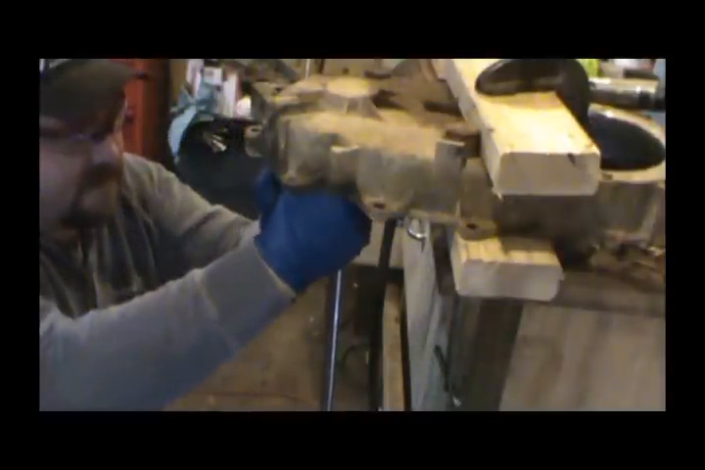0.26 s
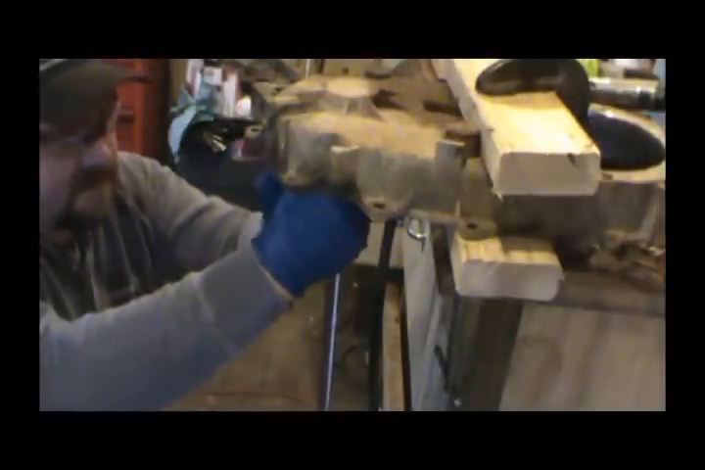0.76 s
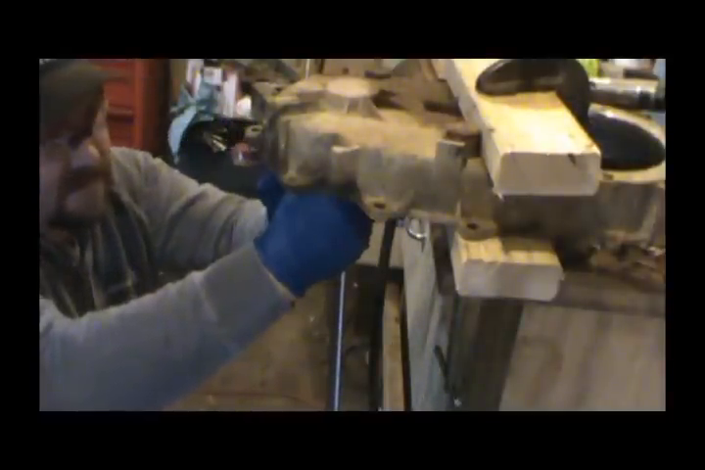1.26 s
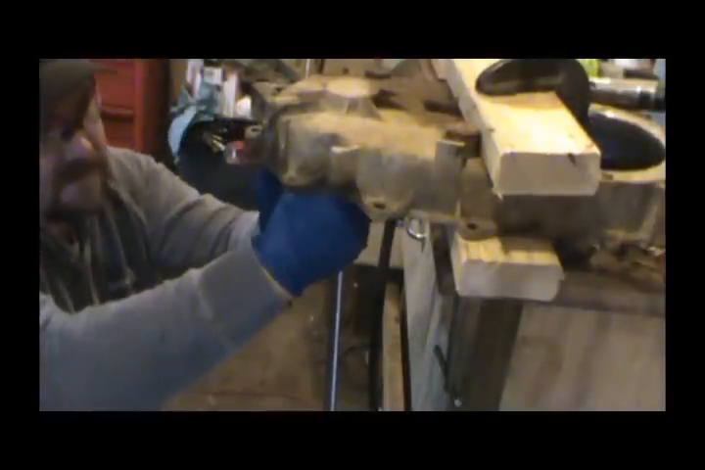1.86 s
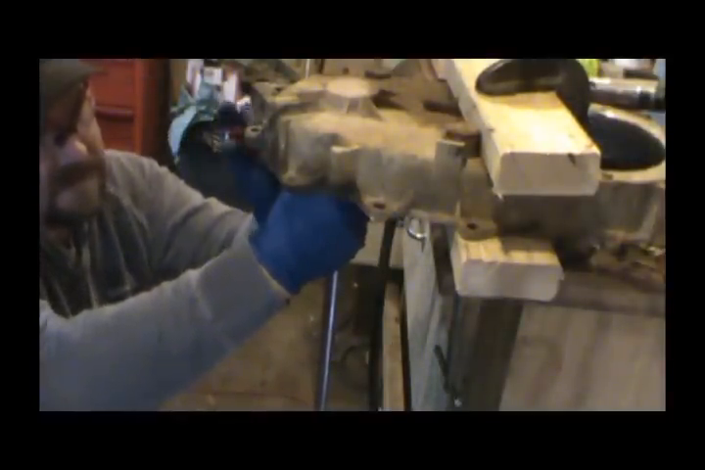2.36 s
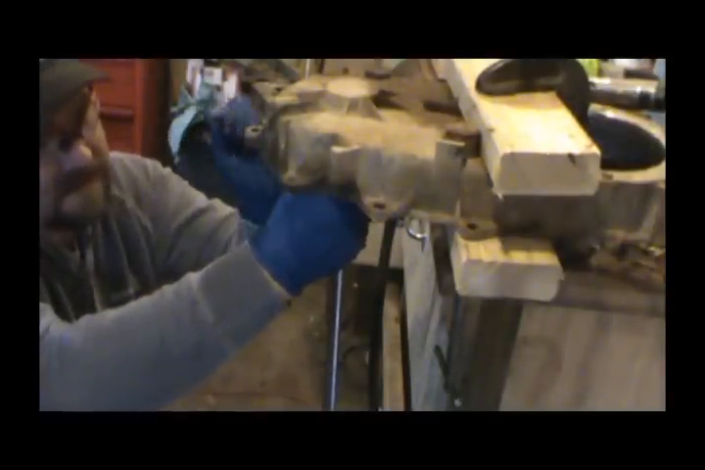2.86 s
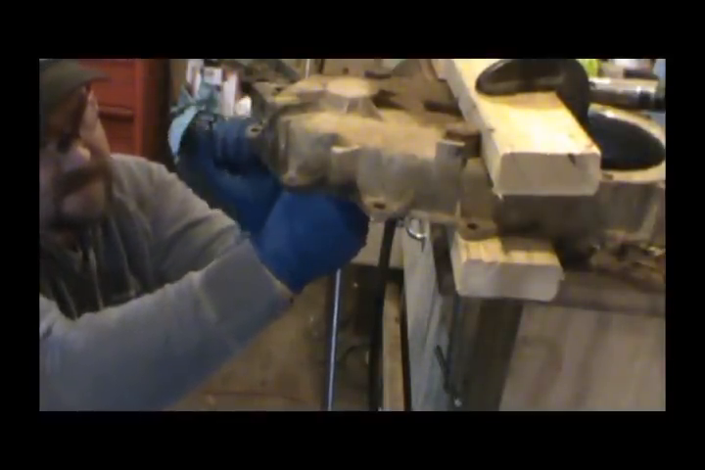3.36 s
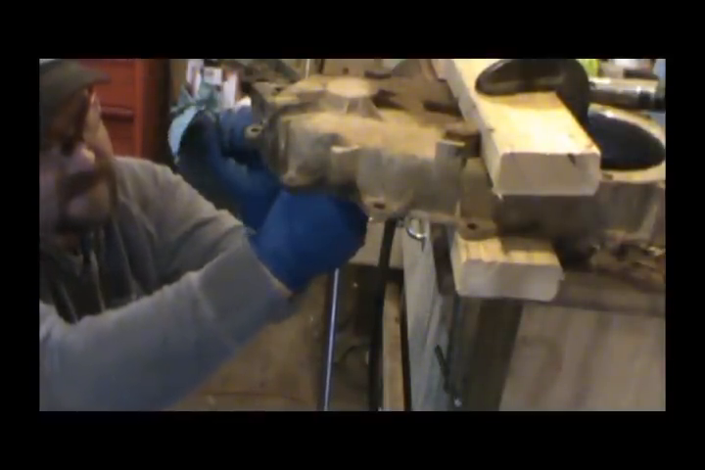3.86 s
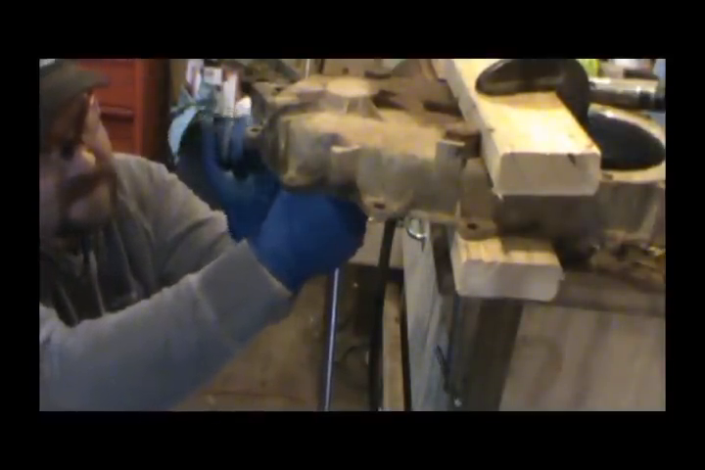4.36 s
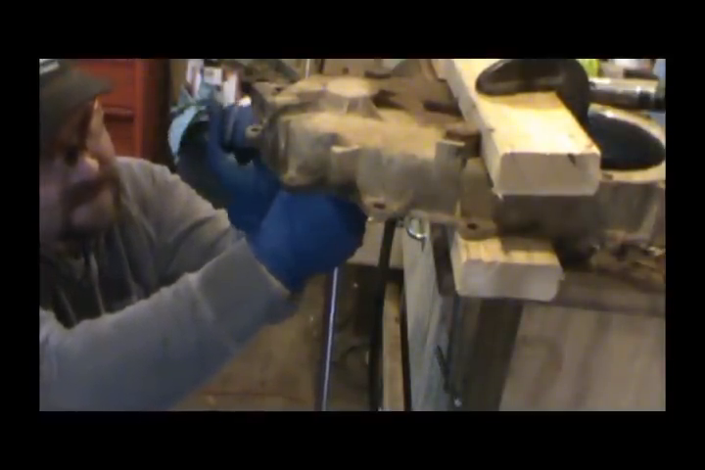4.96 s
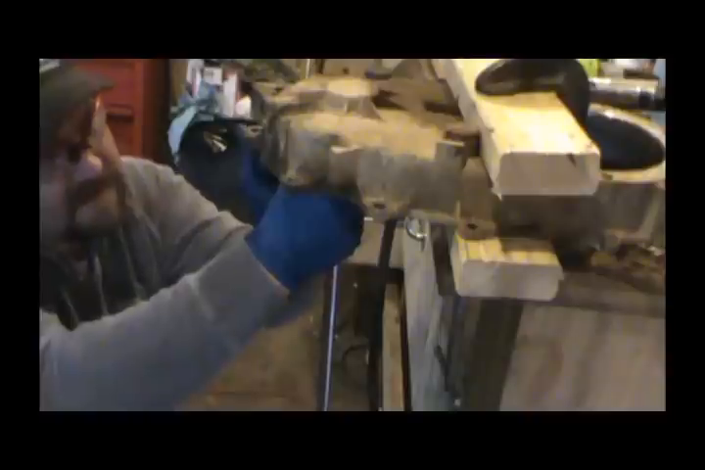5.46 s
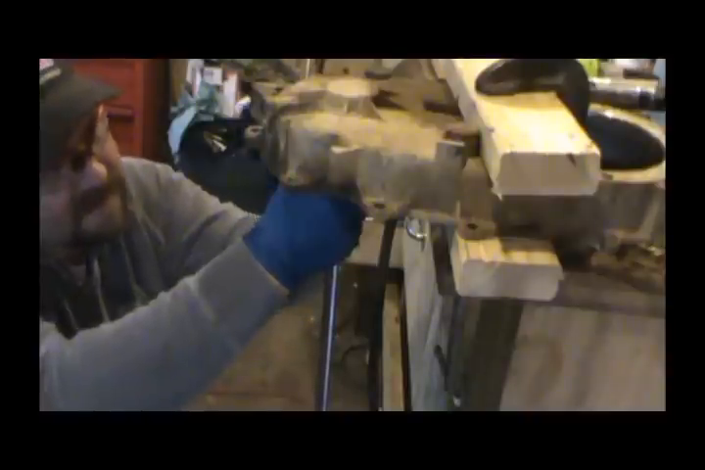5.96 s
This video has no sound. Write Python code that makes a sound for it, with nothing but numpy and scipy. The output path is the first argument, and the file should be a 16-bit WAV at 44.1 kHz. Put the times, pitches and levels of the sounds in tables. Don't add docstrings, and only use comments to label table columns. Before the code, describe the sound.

Slide hammer weight scrapes along its steel rod and slams its stop in irregular sharp clanks and thuds, in a small humming workshop.

```python
import sys
import numpy as np
from scipy import signal
from scipy.fft import rfft, irfft
from scipy.io import wavfile
from scipy.ndimage import uniform_filter1d

SR = 44100
rng = np.random.default_rng(int(sys.argv[2]) if len(sys.argv) > 2 else 0)


def how_loud(loudness_db):
    steps = np.asarray(loudness_db, float) / 20
    return 10 ** steps


def unload_audio(sound):
    columns = np.transpose(np.atleast_2d(sound))
    steps = np.round(np.clip(columns, -1, 1) * 32767)
    wavfile.write(sys.argv[1], SR, steps.astype(np.int16))


N = 273640

# [freq_hz, density_db]
HUM_SPECTRUM = [(12, -52), (20, -21), (59, -7), (172, -15), (408, -19), (482, -21.5), (620, -22),
                (775, -24), (843, -19.5), (2430, -35.5), (15800, -37.5)]
# [freq_hz, correlation]
HUM_LIKENESS = [(60, 1.0), (150, 0.95), (380, 0.37), (950, 0.66), (2380, -0.38), (5980, -0.0043),
                (15000, -0.14)]
# [freq_hz, level_db]
WHINE = [(15735, -89)]
# [freq_hz, t60_s]
WALL_T60 = [(150, 0.97), (500, 0.58), (1500, 0.4), (4000, 0.33), (9000, 0.19)]
# [time_s, level_db]
STIR_LEVEL = [(0.0, -57), (0.4, -54), (0.55, -58), (0.96, -56), (1.66, -65.5), (2.21, -55.5), (2.4, -45),
              (2.99, -58), (3.56, -54.5), (3.71, -58), (3.9, -54.5), (4.51, -58.5), (5.2, -59), (5.4, -44),
              (5.61, -54), (6.2, -52)]
# [freq_hz, gain_db]
STIR_COLOUR = [(300, -43), (600, -0.5), (1500, 6.5), (3000, 3), (6000, -2), (12000, -11.5)]
# [start_s, length_s, start_hz, end_hz, level_db]
SQUEAKS = [
    (1.946, 0.01, 11200, 11000, -56),
    (1.965, .01, 11000, 11000, -60),
    (1.98, .01, 11000, 11000, -59),
    (2.35, .02, 11100, 11200, -62),
    (2.105, 0.002, 10500, 8000, -51),
    (4.06, 0.012, 9000, 8800, -58.5),
    (4.965, 0.013, 9040, 9060, -49),
    (5.6, 0.011, 9100, 9100, -52),
    (5.01, .046, 7950, 8550, -61.5),
]

# [freq_hz, width_hz, level_db]
ROD_MODES = [(1083, 6.3, 6.5), (1630, 9.2, 2.5), (1732, 11, 0.5), (2010, 23, 1.5), (2140, 12, 2.5),
             (2414, 5.4, 3.5), (2857, 11, 5), (3054, 20, 4), (2690, 15, -7), (3440, 15, -0.5),
             (4550, 67, -4), (4840, 37, 5), (5200, 38, -4), (2187, 12, -4), (7140, 30, -14), (5730, 30, -6),
             (8150, 40, -8), (3200, 34, 2.5)]
# [freq_hz, level_db]
ROD_HAZE = [(600, -31), (950, -11), (1150, -11.5), (1650, 2), (2400, -8.5), (3100, -2.5), (3600, -7),
            (4100, -9.5), (4950, -5.5), (5700, -11), (6500, -17), (9000, -17.5), (12500, -65)]
# [freq_hz, width_hz, level_db]
BENCH_MODES = [(240, 22, 10.5), (350, 12, -5), (411, 20.3, 2), (530, 5.6, -6), (621.6, 9.3, 1),
               (1128, 12, -6), (760, 8, -5.5), (835, 6.4, -2.5), (982, 51, 0), (1082.6, 7.6, 2),
               (1194, 7.2, -15), (1255, 81, -2.5), (1453, 30, -4), (1582, 12, 3), (1332, 11, -3.5)]
# [freq_hz, level_db]
BENCH_HAZE = [(150, -48), (220, 0), (450, -4.5), (900, -5.5), (1500, 3.5), (2000, -25), (3200, -53)]
# [freq_hz, gain_db]
GRIT_COLOUR = [(3240, -13), (5500, -7.5), (6740, -10.5), (8160, -8.5), (9660, -12.5), (11100, -15.5),
               (13200, -19), (15500, -35)]

# [start_s, length_s, level_db, centre_hz]
SHOVES = [(0.0, 0.21, -50, 580), (0.468, .23, -39.5, 880), (0.767, 0.034, -43, 680),
          (0.841, 0.26, -53, 464), (1.379, 0.08, -45.5, 746), (2.186, 0.21, -48, 467),
          (2.406, 0.097, -27, 784), (2.519, 0.036, -40.5, 513), (2.647, 0.033, -46, 673.5),
          (2.89, 0.21, -49.5, 425), (3.177, 0.093, -53, 685), (3.526, 0.018, -40, 597),
          (3.631, 0.028, -27.5, 715), (3.749, 0.015, -35, 620), (4.249, 0.18, -60, 463),
          (4.934, 0.07, -41.5, 586), (5.228, 0.039, -35, 1030), (5.274, 0.033, -26.5, 1210),
          (5.335, 0.07, -26.5, 1230), (5.51, 0.026, -34, 780), (5.832, 0.023, -32, 480),
          (5.877, 0.037, -35, 486), (5.968, 0.035, -28, 830), (5.349, 0.037, -36, 400),
          (0.517, 0.27, -49.5, 293)]
# [start_s, length_s, level_db, steel_hz, grit_db]
RUBS = [(0.016, 0.034, -50, 2540, -25), (0.058, 0.091, -50.5, 2540, -5), (0.809, 0.056, -49.5, 2150, -8),
        (0.96, 0.075, -57.5, 2150, -6), (1.36, 0.057, -52, 2000, -22), (1.873, 0.042, -53, 4000, -3),
        (1.932, 0.041, -49.5, 4000, -2), (1.967, 0.092, -54.5, 4000, 3.5), (2.717, 0.079, -54.5, 2900, 5),
        (2.867, 0.058, -45.5, 3500, 2), (2.976, 0.047, -52.5, 2500, -12), (4.249, 0.14, -53.5, 3000, -1.5),
        (5.081, 0.13, -59.5, 4500, 5)]
# [start_s, length_s, level_db, steel_hz, grit_db]
SLIDES = [
    (0.361, 0.024, -37.5, 2380, -10),
    (0.534, 0.071, -39, 3500, -17),
    (3.179, 0.026, -43.5, 3720, 1.5),
    (3.535, 0.017, -39.5, 2000, -10),
    (3.563, 0.067, -24.5, 2700, -20),
    (4.733, 0.043, -23, 2880, -21.5),
    (5.228, 0.05, -41, 2000, -10),
    (5.277, 0.057, -31, 3200, -11),
    (5.906, 0.035, -38.5, 2200, -22),
]
# [start_s, length_s, final_db, steel_hz, grit_db]
PULLS = [
    (0.482, 0.042, -37.5, 2480, -19),
    (2.181, 0.018, -31.5, 2420, -11),
    (2.276, 0.13, -25.5, 2690, -31),
    (2.375, 0.035, -22, 3000, -11),
    (2.496, 0.021, -27, 2290, -19),
    (2.63, 0.018, -23, 2840, -22),
    (3.551, 0.015, -28.5, 2200, -22),
    (3.727, 0.019, -19, 2830, -17),
    (5.281, 0.0454, -24, 3520, 3),
    (5.946, 0.02, -23.5, 2390, -18.5),
]
# [start_s, length_s, first_db, steel_hz, grit_db]
REBOUNDS = [(0.408, 0.077, -32.5, 2290, -10), (0.511, 0.064, -36, 2500, -25),
            (0.598, 0.21, -43.5, 2500, -20), (0.767, 0.027, -40, 2150, -17),
            (2.203, 0.076, -25.5, 2850, -16), (2.412, 0.089, -21.5, 2060, -15),
            (2.523, 0.054, -22.5, 3120, -12.5), (2.646, 0.027, -22, 2970, -15),
            (3.21, 0.041, -48, 3480, 10), (3.748, 0.014, -20.5, 2780, -26), (4.772, 0.014, -20, 2850, -10),
            (5.337, 0.079, -24, 1630, -7), (5.516, 0.016, -32, 3300, 7.5), (5.83, 0.04, -34, 1900, -22)]

# [start_db, peak_place_0_1, end_db, colour_spread_octaves]
RUB_MOTION = (-6.5, 0.8, -6.5, 1.5)
SLIDE_MOTION = (-1.5, 2, -5.5, 1.33)
PULL_MOTION = (-11, 1.5, 2, 1.38)
REBOUND_MOTION = (-0.6, 0.02, -18.5, 1.75)
# [start_db, peak_place_0_1, end_db]
SHOVE_MOTION = (-4.5, 0.17, -13)

# [start_s, level_db, mode_hz, swell_s, t60_s]
PINGS = [(0.406, -32.5, 2425, .012, .12), (0.4, -29.5, 2860, 0.0048, 0.11), (0.405, -32.5, 4900, .003, .1),
         (0.42, -35, 1082, .012, 0.075), (0.49, -40, 580, 0.022, 0.14), (0.505, -35, 1082, .015, .08),
         (0.562, -35, 1082, 0.01, 0.17), (0.52, -36, 5700, .001, .02), (3.631, -34, 395, 0.0072, 0.11),
         (2.203, -32, 1800, 0.011, 0.18), (2.214, -41, 8100, 0.0012, .015), (2.243, -44, 8400, .001, 0.018),
         (2.377, -35, 2700, 0.013, .1), (2.377, -28, 1500, 0.019, .1), (2.402, -28, 5600, .01, 0.022),
         (2.4064, -20, 1561, .003, 0.11), (2.4064, -20, 845, 0.0046, 0.14),
         (2.522, -21.5, 4920, .002, 0.055), (3.632, -37.5, 239, 0.01, 0.091), (5.285, -31, 8330, .012, .05),
         (2.638, -30, 2820, 0.011, .1), (3.566, -20, 2435, 0.029, 0.11), (3.566, -20, 3030, 0.014, 0.13),
         (3.568, -26.5, 3440, 0.014, .1), (3.592, -38, 5050, .025, .04), (3.63, -30, 977, 0.0033, 0.06),
         (3.7287, -38, 7900, 0.00083, .01), (3.747, -31, 2450, .008, .1),
         (3.746, -35, 8700, 0.0006, 0.0067), (4.738, -20, 2876, .01, 0.073),
         (4.7653, -17, 2750, 0.0015, 0.026), (5.304, -25, 5150, .008, .05), (5.295, -32, 3162, .02, .08),
         (5.334, -23, 1087, 0.004, 0.15), (5.914, -41, 1085, .015, .05), (5.5144, -24, 7860, 0.0012, 0.033),
         (4.736, -31, 3250, .015, .05), (5.839, -32.5, 590, .006, 0.095), (5.968, -24, 754, 0.006, 0.2),
         (5.966, -25.5, 620, .005, 0.22),
         (0.5, -41, 856, 0.019, .15), (0.541, -42, 5020, .01, .12), (0.55, -49, 3470, .02, .1),
               (0.555, -42, 1698, .02, .15), (0.585, -38, 3320, .006, .05), (0.59, -39, 5050, 0.0092, .05),
               (2.4065, -28, 539, 0.0057, 0.13), (2.4065, -30, 239, 0.0089, 0.15),
               (3.568, -32, 1700, .02, .1), (3.58, -33, 3450, 0.019, .1), (3.572, -26.5, 2160, 0.024, 0.11),
               (3.63, -36, 545, .005, .1), (4.736, -27, 2006, .015, .06), (4.934, -31, 882, .006, 0.063),
               (4.936, -37, 724, .004, .1), (5.838, -34, 343, .006, 0.11), (5.836, -34, 750, 0.0043, .1),
               (5.965, -29, 1040, 0.0037, .12), (5.966, -30, 931, .004, .12),
               (5.33, -26.5, 1333, 0.011, 0.16), (5.966, -28.5, 529, 0.0057, 0.21),
               (5.966, -33, 426, 0.0052, 0.19), (3.729, -31, 4950, .004, 0.068),
               (5.335, -27, 2713, .01, .15), (2.372, -33, 5600, .008, .04),
               (4.745, -28.5, 1089, 0.019, 0.072)]
# [peak_s, level_db, pitch_hz]
CHATTER = [(0.4047, -21.5, 9800), (0.4047, -22, 4660), (0.419, -18, 2500), (2.2031, -25.5, 8018),
           (2.2532, -19, 2390), (2.2656, -29, 2280), (2.3067, -27, 3050), (2.4017, -23, 7570),
           (2.4099, -20, 7500), (2.4125, -31, 5590), (2.4138, -13, 980), (2.4636, -20, 2150),
           (2.5005, -22, 2320), (2.5223, -21, 8450), (2.5227, -23, 5340), (2.5326, -18, 2980),
           (2.5608, -19, 2900), (2.6581, -20, 2020), (3.2114, -31.5, 9100), (3.5646, -16, 2900),
           (3.571, -14, 2940), (3.6337, -17, 1020), (3.6424, -19, 950), (3.729, -13, 2500),
           (3.7477, -11.5, 2820), (3.757, -15, 2690), (4.7471, -21, 1540), (4.7703, -21, 8200),
           (4.772, -16, 5070), (4.825, -28, 1880), (4.8318, -29, 1890), (4.944, -27.5, 793),
           (5.2954, -24, 8250), (5.3021, -24, 8350), (5.3032, -19, 3110), (5.3168, -21, 5200),
           (5.3277, -13, 10340), (5.3284, -10, 4460), (5.3355, -8.5, 1410), (5.3518, -21, 5040),
           (5.3708, -18, 1150), (5.5153, -22, 3330), (5.5211, -12, 7160), (5.8449, -26, 625),
           (5.9675, -13.5, 794), (5.9905, -16, 726), (6.0391, -29, 684), (0.541, -34, 5000),
           (3.7285, -24.5, 5550), (5.3619, -28.5, 390)]
# [start_s, peak_db, centre_hz]
TICKS = [(0.028, -34.5, 2850), (0.102, -34.5, 3330), (0.3634, -35, 2030), (0.5167, -43, 2900),
         (0.828, -41, 2720), (1.4044, -32, 2140), (1.894, -50, 3430), (1.949, -35, 3550),
         (2.2014, -21, 2130), (2.996, -37, 2400), (3.185, -52, 3080), (3.2106, -49, 3140),
         (4.968, -42, 4500), (5.236, -47.5, 2010), (5.282, -37, 3160), (2.104, -41, 6500),
         (6.1357, -36, 3320)]
# [start_s, peak_db, centre_hz, spread_octaves, ring_factor]
THUDS = [(2.4062, -4, 1190, 0.93, 0.49), (2.651, -26.5, 650, 0.65, 1.3), (3.629, -15.5, 815, 0.48, 0.39),
         (3.747, -24, 645, 1.1, 0.29), (4.769, -27.5, 516, 0.69, 0.7), (4.936, -29.5, 864, 0.15, 0.64),
         (5.285, -25, 404, 1.2, 0.48), (5.3277, -5, 1360, 0.55, 0.19), (5.835, -28, 600, 0.53, 0.66),
         (5.9585, -19, 1610, 0.24, 1), (5.965, -16.5, 765, 0.48, 0.46)]
# [start_s, peak_db, centre_hz, spread_octaves, ring_factor]
CLACKS = [(0.404, -13.5, 2880, 1.6, 0.51), (0.5993, -27.5, 1880, 1.2, 0.65),
          (0.7666, -28.5, 2360, 0.62, 0.99), (2.1856, -23.5, 3000, .8, 0.3), (2.377, -18, 3070, 1.1, 1),
          (2.5006, -27, 2440, 0.4, 0.7), (2.5209, -11, 3540, 1.4, 0.67), (2.5343, -17, 2420, 0.32, 1),
          (2.6521, -18, 2940, 0.73, 0.89), (2.9094, -29.5, 2920, 0.51, 0.67),
          (3.5682, -19, 2440, 0.3, 0.93), (3.7281, -13.5, 2800, 0.94, 0.51), (3.7458, -12, 2710, 0.39, .6),
          (4.7412, -21, 2820, 1.4, 0.3), (4.7702, -8, 3000, 1.4, 0.4), (5.3273, -9, 3640, 0.76, 1),
          (5.5151, -18.5, 9630, 1.24, 0.57), (5.5149, -19, 3200, 0.32, 0.45), (5.622, -33, 7060, 0.33, 1),
          (5.8317, -25.5, 4100, 0.12, 0.8), (5.9598, -15, 3530, 0.79, 1)]

# [freq_hz, gain_db]
PORT_COLOUR = [(140, -3), (225, 2.1), (5600, -1.5), (6600, -3), (7600, 1.2), (12000, 2.5), (15000, -6)]
# [freq_hz, gain_db]
LEFT_OVER_RIGHT = [(60, 1), (130, -3), (290, 3.5), (640, -3), (1410, -2), (3100, -3), (6820, -2.5),
                   (10000, 5.5), (15000, 1)]
# [freq_hz, gain_db]
STEREO_WIDTH = [(60, -7), (250, -11.5), (600, -1), (1500, 4), (4000, 3.5), (8000, -1.5), (10500, -9),
                (13000, -18), (16000, -30)]
# [freq_hz, threshold_db]
HIDDEN_FLOOR = [(6000, -62), (10000, -54), (13000, -46), (16000, -40)]


def evened(x):
    return x / np.sqrt(np.mean(x ** 2) + 1e-20)


def read(points, hz):
    f, value = np.transpose(points)
    return np.interp(np.log(hz + 1), np.log(f + 1), value)


def add(mix, start_s, sound):
    part = mix[round(start_s * SR):][:len(sound)]
    part += sound[:len(part)]


def tinted(x, gain):
    count = x.shape[-1]
    return irfft(rfft(x) * gain(np.fft.rfftfreq(count, 1 / SR)), count)


def hum():
    frames = N // 256 + 5
    hz = np.fft.rfftfreq(1024, 1 / SR)
    a, b, c, d, patches = rng.standard_normal((frames, 513, 5)).T
    patches = uniform_filter1d(patches, 12, 0)
    patches = evened(uniform_filter1d(patches, 20, 1))
    same = np.clip(read(HUM_LIKENESS, hz), -1, 1)[:, None]
    left = a + 1j * b
    right = same * left + np.sqrt(1 - same ** 2) * (c + 1j * d)
    level = how_loud(read(HUM_SPECTRUM, hz)[:, None] + 0.21 * patches) * (hz[:, None] > 15)
    noise = signal.istft(np.array([left, right]) * level, nperseg=1024, noverlap=768)[1][:, :N]
    return how_loud(-52.5) * evened(noise)


def walls(x):
    same = 0.66
    taps = np.zeros((2, SR))
    at = np.arange(200, SR - 20, 20) + rng.integers(0, 20, (2, (SR - 201) // 20))
    np.put_along_axis(taps, at, rng.choice([-1., 1.], at.shape), 1)
    taps[1] = same * taps[0] + np.sqrt(1 - same ** 2) * taps[1]
    hz, t, z = signal.stft(taps, SR, nperseg=256)
    decay = how_loud(-60 * t / read(WALL_T60, hz)[:, None])
    tail = signal.istft(z * decay, SR, nperseg=256)[1]
    return signal.fftconvolve(x[None], tail / np.linalg.norm(tail[0]), axes=1)[:, :N]


def stir():
    ticks_per_s = 30
    tick_size = how_loud(3.5 * np.minimum(rng.exponential(1, N), 2))
    ticks = tick_size * (rng.random(N) < ticks_per_s / SR)
    brush = tinted(rng.standard_normal(N) + 7.0 * ticks, lambda f: how_loud(read(STIR_COLOUR, f)))
    level_db = np.interp(np.arange(N) / SR, *np.transpose(STIR_LEVEL)) - 1.5
    return how_loud(level_db) * evened(brush)


def squeak(start_s, length_s, start_hz, end_hz, level_db):
    count = round(length_s * SR)
    waver = 1 + 0.043 * uniform_filter1d(rng.standard_normal(count), 40)
    hz = np.linspace(start_hz, end_hz, count) * waver
    whistle = np.hanning(count) * np.sin(2 * np.pi * np.cumsum(hz) / SR)
    return start_s, how_loud(level_db) * np.sqrt(2) * whistle


def bell_db(hz, centre_hz, octaves):
    return np.maximum(-6 * (np.log2((hz + 1) / centre_hz) / octaves) ** 2, -45.0)


def ring(peaks, haze, haze_db, haze_t60_s, chance_db, centre_hz, octaves, ring_factor):
    t = np.arange(SR // 6) / SR
    longer = np.clip(ring_factor, .15, 4)
    hz, width_hz, db = (c[:, None] for c in np.transpose(peaks))
    chance = rng.random((len(peaks), 2))
    strength_db = db + bell_db(hz, centre_hz, octaves) + chance_db * chance[:, :1]
    t60_s = longer * 2.2 / (width_hz + hz / 120)
    sign = np.sign(chance[:, 1:] - .5)
    modes = (how_loud(strength_db - 60 * t / t60_s) * np.sin(2 * np.pi * hz * t) * sign).sum(0)

    puff = rng.standard_normal(len(t)) * how_loud(-60 * t / (haze_t60_s * longer))
    lumps = np.sqrt(uniform_filter1d(abs(rfft(puff)) ** 2, size=25))
    blur = tinted(puff, lambda f: how_loud(read(haze, f) + bell_db(f, centre_hz, octaves)) / lumps)

    both = evened(modes) + how_loud(haze_db) * evened(blur)
    both *= np.minimum(t * centre_hz * .8, 1)
    both *= np.cos(3 * np.pi * t) ** 2
    return both / np.linalg.norm(both)


def bench(*contact):
    return ring(BENCH_MODES, BENCH_HAZE, -1.0, .09, 5.0, *contact)


def rod(*contact):
    return ring(ROD_MODES, ROD_HAZE, 4.0, .04, 7.0, *contact)


def slips(length_s, start_db, peak_place, end_db):
    slips_per_s = 3000
    count = round(length_s * SR)
    places = [0, np.clip(peak_place, .01, .99), 1]
    shape_db = np.interp(np.arange(count) / count, places, [start_db, 0, end_db])
    size, sign, happens = rng.random((SR // 3, 3))[:count].T
    force = how_loud(-2.5 * np.log(size + 0.019)) * np.sign(sign - .5) * (happens < slips_per_s / SR)
    edges = signal.windows.tukey(count, min(1, 260 / count))
    return evened(force) * how_loud(shape_db) * edges, shape_db


def shove(start_s, length_s, level_db, bench_hz):
    force, _ = slips(length_s, *SHOVE_MOTION)
    return start_s, how_loud(level_db) * signal.fftconvolve(force, bench(bench_hz, 0.87, 0.79))


def stroke(motion, start_s, length_s, level_db, rod_hz, grit_db):
    *swell, octaves = motion
    force, shape_db = slips(length_s, *swell)
    octaves = max(octaves - 0.07 * (level_db + 30.5), .3)
    out = signal.fftconvolve(force, rod(rod_hz, octaves, 0.66))

    click = tinted(np.eye(1, 256)[0], lambda f: how_loud(read(GRIT_COLOUR, f)))
    grain = np.roll(click, 128) * np.hanning(256)
    gritty = force * how_loud(grit_db + 0.5 * shape_db)
    add(out, 0, signal.fftconvolve(gritty, grain / np.linalg.norm(grain))[128:])
    return start_s, how_loud(level_db) * out


def ping(start_s, level_db, mode_hz, swell_s, t60_s):
    t = np.arange(SR // 3) / SR
    swell_s = max(swell_s, .0001)
    decay_db = 60 * np.maximum(t - swell_s, 0) / np.clip(t60_s, .002, .3)
    level = np.minimum(t / swell_s, 1) * how_loud(level_db - decay_db)
    drift = uniform_filter1d(rng.standard_normal((2, len(t))), size=150, axis=1)
    re, im = (evened(v) for v in uniform_filter1d(drift, size=150, axis=1))
    flicker = 1 + 0.36 * np.minimum(t / 0.0082, 1) * (re + 1j * im)
    return start_s, level * (flicker * np.exp(2j * np.pi * mode_hz * t)).imag


def knock(peak_s, level_db, pitch_hz):
    rise_s, t60_s = 1.5 / pitch_hz, 21 / pitch_hz
    return ping(peak_s - rise_s, level_db - 1, pitch_hz, rise_s, t60_s)


def blows(rows, body):
    out = np.zeros(N)
    for start_s, peak_db, *contact in rows:
        sound = body(*contact)
        add(out, start_s, how_loud(peak_db) * sound / abs(sound).max())
    return out


def scene():
    gloves = np.zeros(N)
    for row in SQUEAKS:
        add(gloves, *squeak(*row))

    ticks = [(*row, 0.88, 0.79) for row in TICKS]
    hammer = stir() + blows(THUDS, bench) + blows(CLACKS + ticks, rod)
    for row in SHOVES:
        add(hammer, *shove(*row))
    strokes = ((RUB_MOTION, RUBS), (SLIDE_MOTION, SLIDES), (PULL_MOTION, PULLS), (REBOUND_MOTION, REBOUNDS))
    for motion, rows in strokes:
        for row in rows:
            add(hammer, *stroke(motion, *row))
    for row in PINGS:
        add(hammer, *ping(*row))
    for row in CHATTER:
        add(hammer, *knock(*row))

    turn = 2 * np.pi * 3.1 * np.arange(N) / SR
    echoes = walls(hammer * np.cos(turn)) + walls(hammer * np.sin(turn))
    direct = np.array([hammer, np.roll(hammer, 1)])
    near = how_loud(-2.5) * direct + how_loud(-10.0) * echoes + gloves
    sides = [[.5], [-.5]]
    ported = tinted(near, lambda f: how_loud(read(PORT_COLOUR, f) + read(LEFT_OVER_RIGHT, f) * sides))
    return ported + hum()


def roll_off(x):
    return signal.sosfilt(signal.butter(12, 16790, fs=SR, output="sos"), x)


def record(dry):
    edge_hz = 15850
    t = np.arange(N) / SR
    dry = dry + sum(how_loud(db + 11.0) * np.sin(2 * np.pi * hz * t) for hz, db in WHINE)

    hz, _, z = signal.stft(dry, SR, nperseg=512)
    level = uniform_filter1d(abs(z).mean(0), size=5, axis=0)
    hidden = level < level.max(0) * how_loud(read(HIDDEN_FLOOR, hz))[:, None]
    left, right = signal.istft(z * ~hidden, SR, nperseg=512)[1][:, :N]

    mid = tinted(left + right, lambda f: .5 * (f < edge_hz))
    side = tinted(left - right, lambda f: .5 * (f < edge_hz) * how_loud(read(STEREO_WIDTH, f)))
    return roll_off(np.array([mid + side, mid - side]))


dry = scene()
out = record(dry)
unload_audio(out)
```